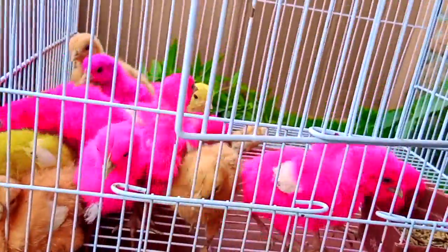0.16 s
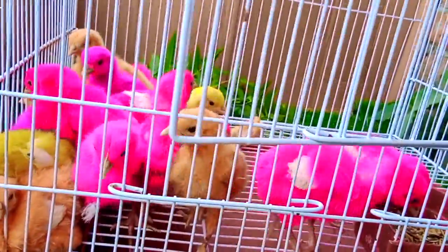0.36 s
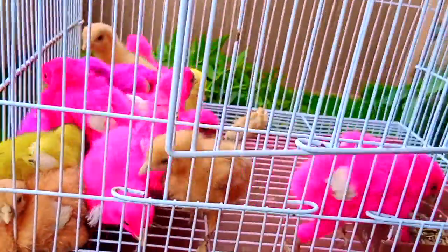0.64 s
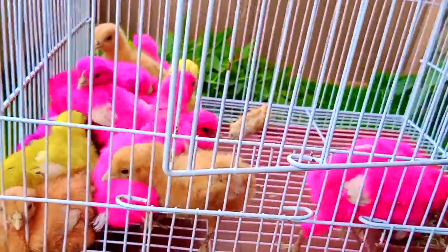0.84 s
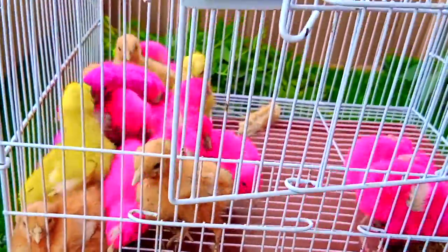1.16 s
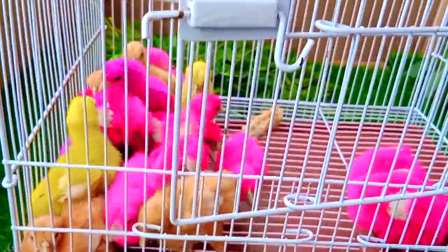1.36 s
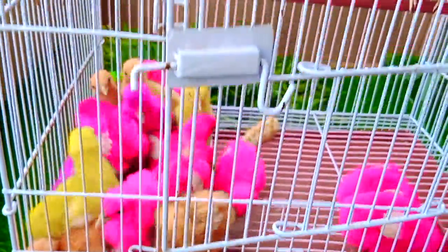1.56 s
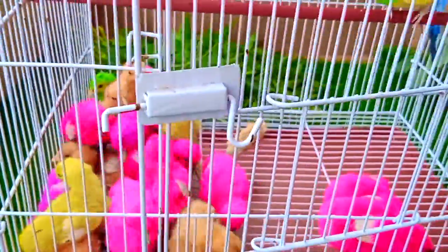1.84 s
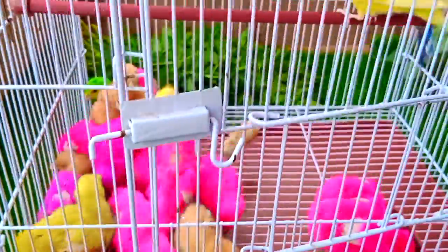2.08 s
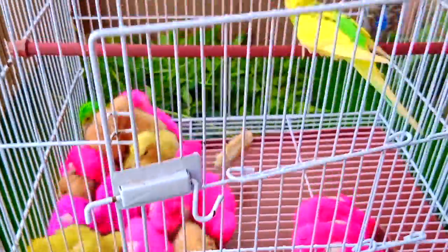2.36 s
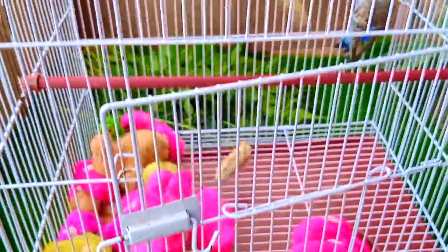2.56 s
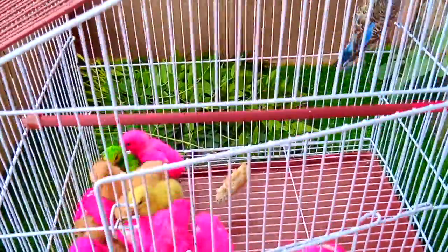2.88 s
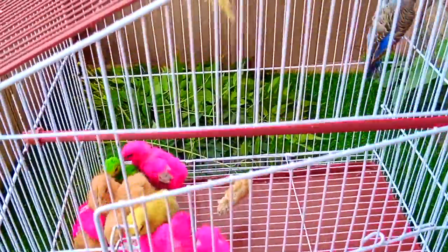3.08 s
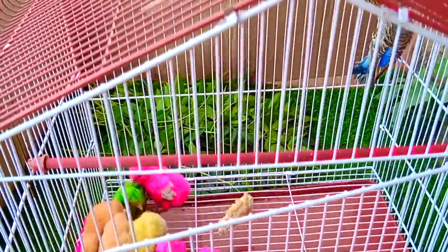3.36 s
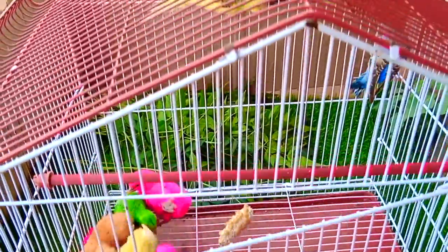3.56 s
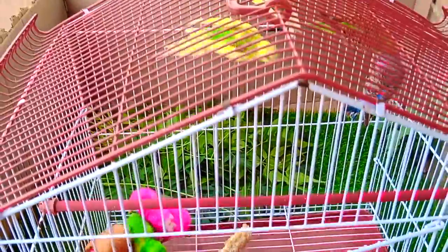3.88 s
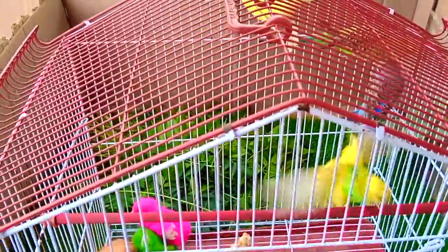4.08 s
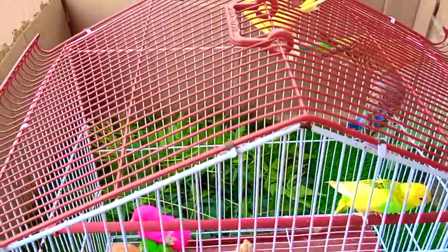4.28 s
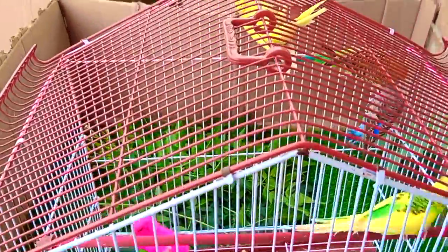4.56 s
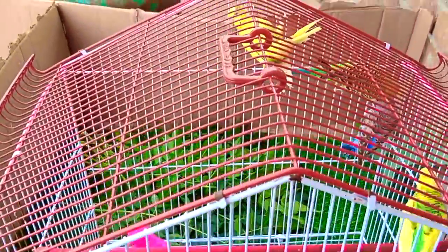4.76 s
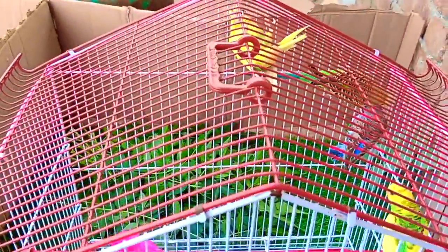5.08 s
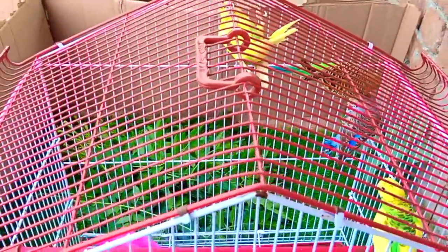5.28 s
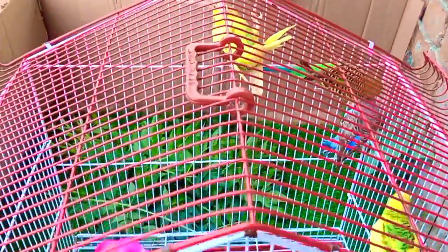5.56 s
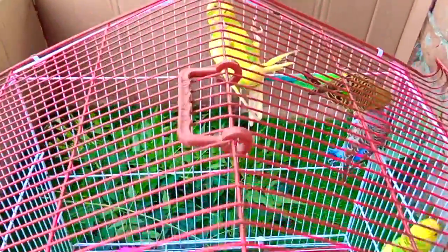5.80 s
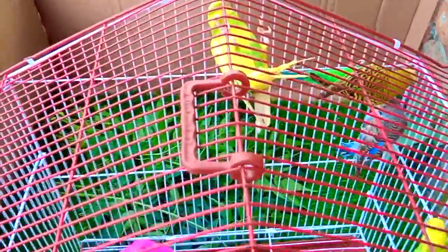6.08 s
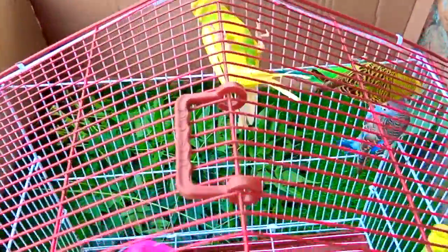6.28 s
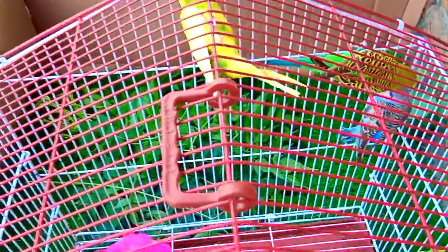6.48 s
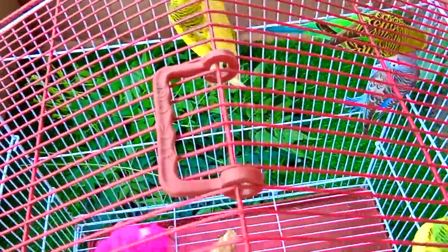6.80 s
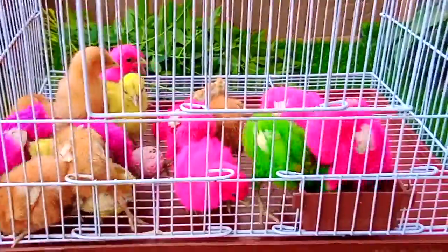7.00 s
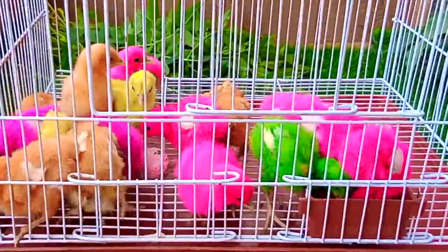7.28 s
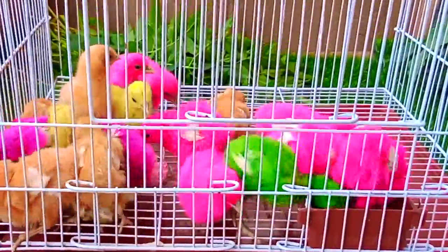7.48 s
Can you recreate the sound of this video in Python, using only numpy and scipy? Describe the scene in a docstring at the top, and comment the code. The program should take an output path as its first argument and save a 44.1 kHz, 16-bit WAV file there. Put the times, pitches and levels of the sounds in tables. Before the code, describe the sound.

Close, lightly echoing cage ambience: rapid high chick peeps, some falling, others flicking upward, over faint room noise and feather rustle. Plastic ticks come first, then two short budgerigar chirps. A puff of wings ends in a sharp, dominant cage knock, followed by lighter knocks and scuffs. A strong scratchy chirp bursts out late, and a weaker one with a raspy scratch closes.

```python
"""Chicks peep throughout in a wire cage inside a cardboard box: swept, nearly pure tones, over quiet room noise.
Within the first second beaks ring the plastic tray and a thin trill sounds; budgerigars chirp at 2.4 and 3.5 s.
At 4 s a bird flutters (low puffs, rustle) and lands on a perch with a hard knock; taps and knocks follow.
The loudest chirp comes at 6.3 s, then a trill; a last trill and a weaker chirp come at 7.5 s.
Chirps are sliding notes that crack hoarsely; feathers are shaped noise, and box and room add echoes."""
import sys
import numpy as np
from scipy import signal
from scipy.fft import rfft, irfft, next_fast_len
from scipy.io import wavfile
from scipy.ndimage import map_coordinates

SR = 44100
rng = np.random.default_rng(int(sys.argv[2]) if len(sys.argv) > 2 else 0)


def transcribe(signal):
    """Save signal, clipped to [-1, 1], as a 16-bit WAV file at the path in sys.argv[1]."""
    frames = np.atleast_2d(signal).T
    limited = np.clip(frames, -1, 1)
    pcm = np.round(limited * 32767).astype(np.int16)
    wavfile.write(sys.argv[1], SR, pcm)


N = 336924
TIME_S = np.arange(N) / SR

# Room noise spectrum. Each row: frequency in Hz, relative density in dB.
ROOM_TONE = [(25, -31.5), (50, -12.5), (85, -1), (260, -4.5), (370, -4.5), (520, -5), (1000, -13.5),
             (1400, -6), (1750, -14.5), (2800, -19.5), (3600, -27.5), (4600, -41)]
# Faint drone bands. Each row: centre in Hz, width in Hz, level in dB.
HUM = [(234.4, 11, -80), (369.7, 30, -77)]
# Room decay. Each row: frequency in Hz, t60 in seconds.
ROOM_DECAY = [(200, 0.63), (2500, 0.36), (5000, 0.069), (12000, 0.054)]
# Box wall echoes. Each row: delay in seconds, gain in dB.
WALL_ECHOES = [(.0023, -20.5), (.0041, -16.5), (.0082, -11.5), (0.0098, -20.5)]
# Feather and foot rustles. Each row: start in seconds, length in seconds, level in dB.
RUSTLES = [(.1, 0.21, -68), (.64, .122, -57), (.85, .213, -65.5), (1.17, .14, -56), (2.1, 0.28, -67.5),
           (2.97, 0.092, -58), (3.21, 0.059, -65.5), (4.0, .22, -53.5), (4.76, .2, -63), (5.5, 0.46, -62),
           (7.03, 0.18, -58.5), (7.53, .13, -56.5)]
# Feather spectrum. Each row: frequency in Hz, relative density in dB.
FEATHER_SPECTRUM = [(600, -34), (1400, -3), (2500, 11), (4800, -5.5), (5600, 5), (6800, 3.5), (8000, 20),
                    (9500, 4.5), (13000, 5), (15500, 1)]
# Scratchy rasps of the birds. Each row: start in seconds, length in seconds, level in dB.
RASPS = [(2.415, 0.045, -54), (4.02, .18, -68.5), (6.9, .6, -59), (7.535, 0.05, -37), (7.58, 0.061, -46)]
# Rasp spectrum. Each row: frequency in Hz, relative density in dB.
RASP_SPECTRUM = [(2000, -23.5), (5000, -16.5), (6000, -3.5), (7200, 9), (8500, -19.5), (10000, -22.5),
                 (15000, -5)]
# Wing draughts and handling bumps. Each row: start in seconds, length in seconds, centre in Hz,
# relative level in dB.
BUMPS = [(.73, 0.087, 226, -57.5), (1.037, 0.21, 228, -67.5), (2.523, 0.11, 85, -56.5),
         (4.013, 0.16, 162, -44.5), (4.089, 0.095, 122, -40), (5.779, 0.069, 146, -49.5),
         (6.241, 0.16, 273.6, -55.5), (6.908, 0.14, 147.5, -63.5), (7.331, 0.08, 157.4, -54.5)]
# Bump spectrum. Each row: multiple of the centre, relative density in dB.
BUMP_SPECTRUM = [(.2, -28.5), (.6, -4), (1, 4), (1.5, -11.5), (4, -17.5), (12, -19.5), (30, -43.5)]
# Feet scuffing the tray. Each row: start in seconds, length in seconds, level in dB.
SCUFFS = [(.655, 0.29, -65.5), (.89, 0.046, -48.5), (1.2, 0.14, -58.5), (4.77, 0.098, -65),
          (5.07, 0.056, -64), (5.49, 0.058, -54), (5.72, 0.16, -55.5), (7.08, 0.4, -62)]
# Beak taps and claw strikes; the ring varies with the spot struck. Each row: start in seconds,
# relative peak in dB, ring in Hz.
PECKS = [(0.6604, -23, 1281), (0.6854, -48, 1240), (0.7421, -29.5, 1210), (0.8984, -31.5, 1267),
         (0.9572, -36, 1304), (1.218, -46, 1480), (3.056, -45, 1257), (4.5021, -41.5, 1450),
         (4.8, -45.5, 1380), (5.0828, -42, 1376), (5.3522, -50, 1371), (5.6321, -42.5, 1380)]
# Tray resonances. Each row: reference centre in Hz, width in Hz, relative gain in dB.
TRAY_MODES = [(770, 29, -1.5), (1339, 25, 22.5), (1620, 430, -3.5), (2304, 284, -0.5)]
# Knocks on the cage. Each row: start in seconds, relative level in dB, thud and wire tick in dB on top of it.
KNOCKS = [(4.102, -8.5, -11.5, -27), (4.643, -33.5, -44, 3.5), (5.512, -27.5, -29.5, -40),
          (5.745, -30.5, -18.5, -10.5), (5.822, -44.5, -17.5, 5), (6.846, -25, -21, -29),
          (7.312, -51.5, 19.5, -3.5), (7.371, -39.5, 8, -51)]
# Cage resonances. Each row: centre in Hz, width in Hz, relative gain in dB.
CAGE_MODES = [(549, 37, -6.5), (783, 44, -5.5), (1490, 215, 3.5), (1780, 710, -4.5), (2066, 230, 2),
              (2530, 170, -4), (2580, 310, -7.5), (4120, 330, -18.5), (7000, 440, -39.5)]
# Gain of throat and beak. Each row: frequency in Hz, gain in dB.
THROAT = [(3200, -2), (4100, -5.5), (4900, -24.5), (5600, -6), (6300, -14), (7200, -4), (8500, -5.5),
          (10000, -18), (12000, -34), (14500, 2)]
# Thin trills. Each row: start in seconds, length in seconds, centre in Hz, swing each way in Hz,
# swings a second, level in dB.
TRILLS = [(0.515, 0.077, 4968, 952, 39, -48.5), (6.388, 0.058, 3640, 588.6, 26, -45),
          (7.503, .032, 3750, 457, 38, -47.5)]
# Chirp notes. Each row: start in seconds, length in seconds, slide start in Hz, slide end in Hz,
# relative level in dB.
NOTES = [(2.434, .04, 3250, 2145, -15.5), (2.476, .028, 1996, 1729, -25), (2.506, .034, 2550, 3124, -19),
         (3.52, .032, 3800, 2380, -21.5), (3.549, .041, 2860, 1983, -18), (3.59, .025, 3436, 3420, -28),
         (3.614, .024, 2935, 2615, -15.5), (6.252, .032, 3550, 2383, -10), (6.282, .04, 2933, 1916, -4.5),
         (6.32, .027, 3532, 3415, -11), (6.344, .031, 2970, 2650, -5), (7.537, .041, 3633, 2646, -27),
         (7.582, 0.016, 3950, 3560, -32.5), (7.601, 0.017, 1760, 1790, -33),
         (7.618, 0.038, 2799, 3080, -19)]
# Spectrum of the grit in a note. Each row: frequency in Hz, relative density in dB.
GRIT_SPECTRUM = [(1400, -37), (1950, 23), (3700, 19), (4800, -23.5), (8000, -10), (10500, -26.5),
                 (13000, -12.5), (15500, -13.5)]
# Nearer falling peeps. Each row: start in seconds, length in seconds, top in Hz, level in dB.
FALLING = [(-.007, .068, 3273, -52), (.128, 0.05, 4250, -38), (.165, .066, 4210, -47.5),
           (.251, .043, 4134, -42), (.366, 0.064, 3770, -47), (.402, 0.06, 4320, -55),
           (.447, 0.046, 3110, -51.5), (.635, 0.042, 3760, -39), (.78, .054, 3412, -53),
           (.829, .057, 4020, -51.5), (.979, .057, 4176, -49), (1.12, .091, 4360, -47.5),
           (1.206, 0.069, 3370, -54), (1.364, .066, 3520, -52.5), (1.551, .054, 3405, -57),
           (1.671, 0.071, 4110, -57.5), (1.83, .075, 3180, -45), (2.03, 0.05, 3450, -62.5),
           (2.29, .065, 3560, -47.5), (2.341, .055, 3640, -52.5), (2.6, .043, 4120, -48.5),
           (2.718, 0.074, 2757, -41.5), (2.75, .059, 4256, -49), (2.839, .1, 3584, -47),
           (3.003, .056, 3347, -42.5), (3.12, 0.054, 3070, -54.5), (3.147, 0.094, 3800, -49),
           (3.287, .076, 4116, -51.5), (3.415, .053, 3265, -49.5), (3.986, .053, 3274, -44.5),
           (4.132, 0.032, 2990, -46.5), (4.216, 0.099, 3020, -52.5), (4.24, .048, 3973, -54.5),
           (4.347, .04, 3094, -47.5), (4.41, .055, 4226, -61), (4.52, 0.05, 3402, -52),
           (5.077, 0.05, 3040, -48), (5.265, 0.051, 3810, -63), (5.455, .08, 3720, -58),
           (5.741, 0.056, 3138, -46), (5.94, .05, 3260, -44), (6.026, 0.029, 2862, -50),
           (6.112, 0.077, 3846, -48.5), (6.758, .058, 3633, -39), (6.905, .041, 3564, -53),
           (7.44, 0.25, 2780, -54.5)]
# Peeps that end in an upward flick. Each row: start in seconds, length in seconds, start in Hz,
# turning pitch in Hz, level in dB before the flick's fade.
FLICKING = [(0.671, 0.05, 3400, 2850, -41), (0.905, .075, 2590, 2840, -45.5),
            (1.253, 0.076, 2485, 2700, -33), (1.474, 0.065, 2213, 2361, -31.5),
            (1.621, 0.074, 3510, 2982, -42), (1.846, .072, 2488, 3137, -35),
            (2.163, 0.061, 2590, 2476, -31), (2.396, 0.082, 2575, 3250, -38.5),
            (2.779, 0.077, 2994, 2558, -37), (3.02, 0.053, 2465, 3097, -29.5),
            (3.149, 0.061, 2138, 2490, -43), (3.354, 0.075, 3386, 2722, -36.5),
            (3.894, 0.066, 3293, 2824, -41.5), (4.413, 0.072, 2986, 2530, -39),
            (4.652, 0.057, 2475, 2486, -38.5), (4.998, 0.069, 2450, 2379, -38.5),
            (5.413, 0.064, 2923, 3067, -49), (5.636, 0.075, 2973, 2720, -35.5),
            (6.127, .06, 2916, 3260, -46), (6.203, 0.079, 2797, 2550, -35), (6.569, 0.048, 3013, 3348, -48),
            (6.728, 0.08, 2954, 2608, -28), (6.95, 0.08, 3043, 3227, -36), (7.097, 0.098, 3554, 2976, -44),
            (7.355, 0.075, 4250, 3230, -38.5), (7.417, 0.079, 3316, 3067, -37.5)]

HISS_MEAN_DB, FIDGET_MEAN_DB = -79.5, -77
NOTE_ATTACK_S, NOTE_RELEASE_S, NOTE_SWELL_DB = .0052, .0045, 3.5
CHIRP_GAP_S = .1  # a longer interval between note starts begins a new chirp
CHIRP_EASE_S, CHIRP_EASE_DB, CHIRP_EASE_SHARE = .018, -16.5, .12
CRACK_S, LEAP_S, CRACK_HZ = .006, .004, 1920
REST_HZ, FALL_SHARE, CREST_SHARE = 2700, .64, .2  # crest as a share of the call
FAINT_PER_S = 3
FAINT_LENGTH_S, FAINT_TOP_HZ, FAINT_DB = (.05, .085), (2950, 3500), (-68, -61)
TURN_SHARE, FLICK_TOP_HZ, FLICK_LATENESS = .39, 4120, 1.5
FLICK_DB_PER_OCTAVE = -19
MIC_TOP_HZ = 15800


def amp(db):
    """Decibels to gain."""
    return 10 ** (np.asarray(db) / 20)


def unit(x):
    """Scale to rms 1."""
    return x / np.sqrt(np.mean(x ** 2) + 1e-20)


def along(points, hz):
    """Read (Hz, value) points on a log frequency axis."""
    f, v = np.transpose(points)
    return np.interp(np.log(hz + 1), np.log(f + 1), v)


def filtered(x, response):
    """Filter x by a response given as a function of Hz."""
    size = next_fast_len(len(x) + 8192)
    spectrum = rfft(x, size) * response(np.fft.rfftfreq(size, 1 / SR))
    return irfft(spectrum, size)[:len(x)]


def noise(spectrum, size=N):
    """Coloured noise of rms 1."""
    return unit(filtered(rng.standard_normal(size), lambda hz: amp(along(spectrum, hz))))


def wobble(knots_per_s, size=N):
    """Smooth random curve."""
    position = np.arange(size) * knots_per_s / SR + 2
    return map_coordinates(rng.standard_normal(4096), [position], mode="wrap")


def add(track, start_s, sound):
    """Mix a sound into the track, cut at both ends of the track."""
    start = round(start_s * SR)
    part = sound[max(-start, 0):max(N - start, 0)]
    track[max(start, 0):][:len(part)] += part


def swells(rows):
    """Sum of half-sine swells, one per (start s, length s, dB) row."""
    return sum(amp(db) * np.abs(np.sin(np.pi * np.clip((TIME_S - start_s) / length_s, 0, 1)))
               for start_s, length_s, db in rows)


def progress(length_s):
    """Ramp from 0 to 1 over a call."""
    return np.arange(int(length_s * SR)) / (length_s * SR)


def ring(push, modes):
    """Push through parallel resonances of alternating sign, scaled to peak 1."""
    def body(f):
        return sum((-1) ** k * amp(db) * 1j * f * w / (c * c - f * f + 1j * f * w)
                   for k, (c, w, db) in enumerate(modes))
    out = filtered(push, body)
    return out / np.abs(out).max()


def room_tone():
    """Steady room noise, its level drifting slightly."""
    return amp(-70.5 + wobble(6.3)) * noise(ROOM_TONE)


def drone():
    """Narrow bands of noise that hum faintly."""
    def band(hz, width_hz):
        white = rng.standard_normal(N)
        return unit(filtered(white, lambda f: np.exp(-((f - hz) / width_hz) ** 2)))
    return sum(amp(db) * band(hz, width_hz) for hz, width_hz, db in HUM)


def high_hiss():
    """Faint noise strongest near 8 kHz, fluctuating slowly and quickly."""
    spectrum = [(5000, -16), (7200, -16.5), (8000, 1.5), (9200, -21.5), (15000, -6.5)]  # Hz, dB
    return amp(HISS_MEAN_DB + 3.6 * wobble(1) + 2.7 * wobble(8.2)) * noise(spectrum)


def feathers():
    """Rustling noise with a ragged level; the restless huddle adds a fainter, fluctuating floor."""
    flutter = amp(3.5 * wobble(130) + 3 * wobble(25))
    restless_db = 7 * np.tanh(2 * wobble(11))
    fidget = amp(FIDGET_MEAN_DB + restless_db)
    return (swells(RUSTLES) + fidget) * unit(noise(FEATHER_SPECTRUM) * flutter)


def rasps():
    """Scratchy bursts of high noise with a rapidly uneven level."""
    return swells(RASPS) * unit(noise(RASP_SPECTRUM) * amp(2.5 * wobble(230)))


def air_bumps():
    """Low noise puffs: wings and the hand push air at the microphone."""
    puffs = sum(swells([(start_s, length_s, db)]) * noise(np.array(BUMP_SPECTRUM) * [hz, 1])
                for start_s, length_s, hz, db in BUMPS)
    return puffs * amp(1.9 * wobble(77))


def burst(t60_s):
    """Decaying white noise, a quarter second long."""
    t = np.arange(SR // 4) / SR
    return amp(-60 * t / t60_s) * rng.standard_normal(len(t))


def blow(scrape, t60_s):
    """An impulse plus a decaying noisy scrape."""
    push = scrape * burst(t60_s)
    push[0] += 1
    return push


def soft(push):
    """Contact of horn on soft plastic, weak in treble."""
    return filtered(push, lambda hz: amp(along([(2600, 6), (3600, 6), (6000, -18)], hz)))


def scuffs():
    """Claws catch and slip in tiny uneven clicks that ring the tray."""
    claws = (rng.random(N) < 400 / SR) * rng.standard_normal(N) * amp(6.7 * wobble(55))
    return swells(SCUFFS) * unit(ring(soft(claws), TRAY_MODES))


def pecks():
    """Beaks and feet strike the tray; its modes scale together with the spot struck."""
    out = np.zeros(N)
    for start_s, db, hz in PECKS:
        modes = np.array(TRAY_MODES) * [hz / TRAY_MODES[1][0], 1, 1]
        add(out, start_s, amp(db - 4.5) * ring(soft(blow(scrape=.25, t60_s=.026)), modes))
    return out


def cage_knocks():
    """Knocks ring the cage, thud in its base and tick in its wires."""
    out = np.zeros(N)
    thud_modes = [(205, 69, 6), (540, 60, -24), (796, 270, 14)]  # Hz, width Hz, dB
    tick_response = [(3000, -48), (5000, -9), (8000, 1), (15000, -8)]  # Hz, dB
    for start_s, db, thud_db, tick_db in KNOCKS:
        thud = ring(blow(scrape=.092, t60_s=.058), thud_modes)
        tick = filtered(burst(.02), lambda hz: amp(along(tick_response, hz)))
        body = ring(blow(scrape=.09, t60_s=.018), CAGE_MODES)
        knock = amp(db - 5) * body
        knock += amp(db + thud_db - 5.5) * thud
        knock += amp(db + tick_db - 8.5) * tick
        add(out, start_s, knock)
    return out


def whistle(pitch_hz, jitter, overtone_db, slope_db):
    """Syrinx tone: an unsteady sine with overtones that flare at the throat's resonances."""
    unsteady_hz = pitch_hz * (1 + jitter * wobble(700, len(pitch_hz)))
    phase = 2 * np.pi * np.cumsum(unsteady_hz) / SR
    orders = np.arange(2, 7)[:, None]
    gains = amp(overtone_db + slope_db * np.log2(orders / 2) + along(THROAT, orders * pitch_hz))
    return np.sin(phase) + np.sum(gains * np.sin(orders * phase), axis=0)


def budgerigar_trills():
    """Thin tones whose pitch swings fast about a centre."""
    out = np.zeros(N)
    for start_s, length_s, centre_hz, swing_hz, swings_per_s, db in TRILLS:
        u = progress(length_s)
        pitch_hz = centre_hz - swing_hz * np.cos(2 * np.pi * swings_per_s * length_s * u)
        tone = whistle(pitch_hz, jitter=.043, overtone_db=-16, slope_db=-1.5)
        add(out, start_s, amp(db) * np.sin(np.pi * u) * tone)
    return out


def budgerigar_chirps():
    """Sliding notes crack to a low pitch at the end; the next note of the chirp leaps from there."""
    out = np.zeros(N)
    intervals_s = np.diff([note[0] for note in NOTES], prepend=0)
    for (start_s, length_s, start_hz, end_hz, db), interval_s in zip(NOTES, intervals_s):
        u = progress(length_s)
        elapsed_s, left_s = length_s * u, length_s * (1 - u)
        opens_chirp = interval_s > CHIRP_GAP_S
        # a chirp's first note eases in, quieter and from above
        ease = np.clip(1 - elapsed_s / CHIRP_EASE_S, 0, 1) ** 2 * opens_chirp
        leap = np.clip(1 - elapsed_s / LEAP_S, 0, 1) ** 2 * (not opens_chirp)
        crack = np.clip(1 - left_s / CRACK_S, 0, 1)
        slide_hz = start_hz * (end_hz / start_hz) ** u * (1 + CHIRP_EASE_SHARE * ease)
        pitch_hz = slide_hz + (CRACK_HZ - slide_hz) * np.maximum(crack, leap)

        gate = np.clip(np.minimum(elapsed_s / NOTE_ATTACK_S, left_s / NOTE_RELEASE_S), 0, 1)
        tremble_db = 1.4 * wobble(220, len(u))
        swell_db = NOTE_SWELL_DB * (u - 1) + CHIRP_EASE_DB * ease + tremble_db
        swell = np.sin(np.pi / 2 * gate) * amp(swell_db)

        # low and cracking notes turn hoarse: shakier pitch, stronger octave, more grit
        hoarse = np.maximum(np.interp(pitch_hz, [1700, 2400], [1, 0]) ** 2, crack)
        tone = whistle(pitch_hz, jitter=.012 + .04 * hoarse,
                       overtone_db=-25 + 22 * hoarse, slope_db=-17 - 20 * hoarse)
        grit = amp(-26 + 15 * hoarse) * noise(GRIT_SPECTRUM, len(u))
        add(out, start_s, amp(db - 1) * swell * (tone + grit))
    return out


def falling_rows():
    """Nearer falling peeps plus faint random ones from chicks buried in the huddle."""
    chance = rng.random((int(FAINT_PER_S * N / SR), 4))
    low, high = np.transpose([(0, N / SR), FAINT_LENGTH_S, FAINT_TOP_HZ, FAINT_DB])
    return np.vstack([FALLING, low + (high - low) * chance])


def falling_peeps():
    """Chick tones that arch over a crest and slide toward a relaxed pitch."""
    out = np.zeros(N)
    for start_s, length_s, top_hz, db in falling_rows():
        u = progress(length_s)
        arch = np.hypot(u - CREST_SHARE, .25) - .25
        pitch_hz = top_hz + FALL_SHARE * (REST_HZ - top_hz) * arch / arch[-1]
        swell = np.sin(np.pi * u ** .8) ** 1.5
        tone = whistle(pitch_hz, jitter=.005, overtone_db=-20.5, slope_db=-12)
        add(out, start_s, amp(db) * swell * tone)
    return out


def flicking_peeps():
    """Chick tones that bend to a turning pitch, then flick up, fading and growing unsteady."""
    out = np.zeros(N)
    for start_s, length_s, start_hz, turn_hz, db in FLICKING:
        u = progress(length_s)
        bend = np.clip(1 - u / TURN_SHARE, 0, 1) ** 2
        rise = np.clip((u - TURN_SHARE) / (1 - TURN_SHARE), 0, 1)
        flick = np.sin(np.pi / 2 * rise ** FLICK_LATENESS) ** 2
        pitch_hz = (turn_hz + (start_hz - turn_hz) * bend) * (FLICK_TOP_HZ / turn_hz) ** flick
        swell = np.sin(np.pi * u ** .75) ** 1.7
        fade_db = FLICK_DB_PER_OCTAVE * flick * np.log2(FLICK_TOP_HZ / turn_hz)
        tone = whistle(pitch_hz, jitter=.005 + .017 * flick, overtone_db=-31, slope_db=-12.5)
        add(out, start_s, amp(db + fade_db) * swell * tone)
    return out


def space(x, box_db, box_t60_s, room_db):
    """Box walls echo early and blur into a short flutter; the room adds a fainter, longer tail."""
    hz, t, z = signal.stft(rng.standard_normal(SR // 2), SR, nperseg=256)
    decay = amp(-60 * t / along(ROOM_DECAY, hz)[:, None])
    tail = signal.istft(z * decay, SR, nperseg=256)[1]
    t = np.arange(len(tail)) / SR
    box = rng.standard_normal(len(t)) * amp(-60 * t / box_t60_s) * (t > .004)
    echo = amp(box_db) * box / np.linalg.norm(box)
    echo += amp(room_db) * tail / np.linalg.norm(tail)
    for delay_s, db in WALL_ECHOES:
        echo[round(delay_s * SR)] += amp(db)
    return x + signal.fftconvolve(x, echo)[:N]


def scene():
    """Calls and contacts echo in box and room; noise layers are added without echo."""
    background = room_tone() + drone() + high_hiss()
    shuffling = feathers() + rasps() + air_bumps()
    contacts = scuffs() + pecks() + cage_knocks()
    budgerigars = budgerigar_trills() + budgerigar_chirps()
    chicks = falling_peeps() + flicking_peeps()
    near = space(contacts + budgerigars + chicks, box_db=-17, box_t60_s=.081, room_db=-31)
    return (background + shuffling + near)[None]


def record(dry):
    """Microphone response: a dip near 5 kHz, a slight lift below it, and a band limit."""
    response = [(4200, 1.5), (4950, -3.5), (5500, 0)]  # Hz, dB
    return filtered(dry[0], lambda hz: amp(along(response, hz)) * (hz < MIC_TOP_HZ))[None]


dry = scene()
out = record(dry)
transcribe(out)
```